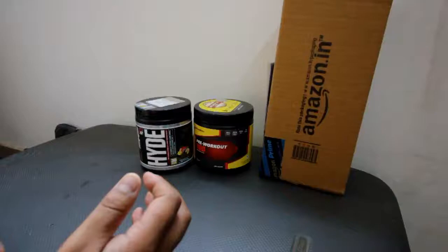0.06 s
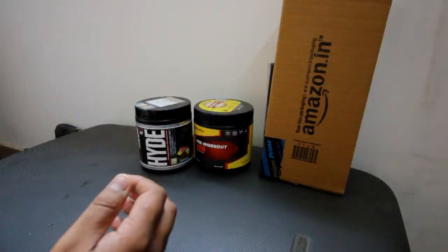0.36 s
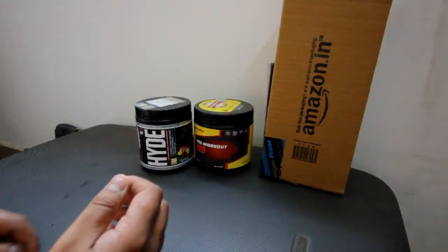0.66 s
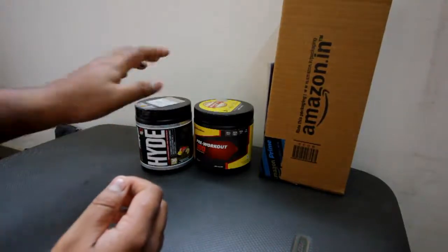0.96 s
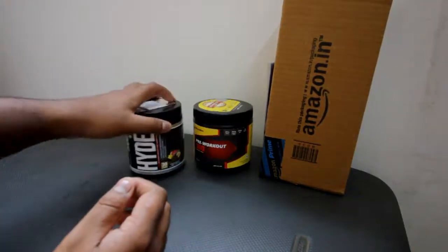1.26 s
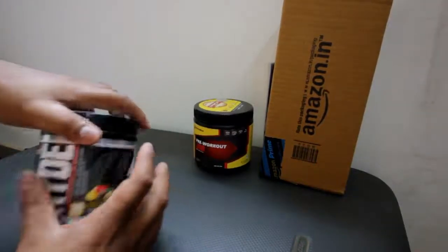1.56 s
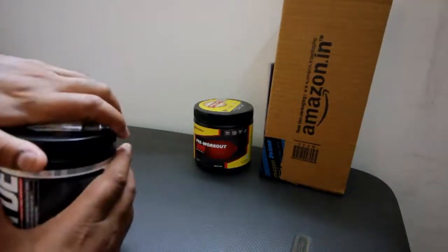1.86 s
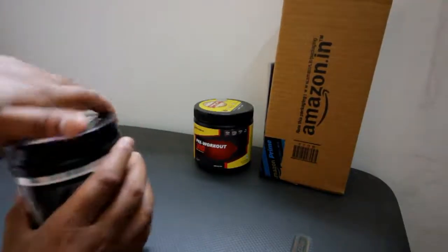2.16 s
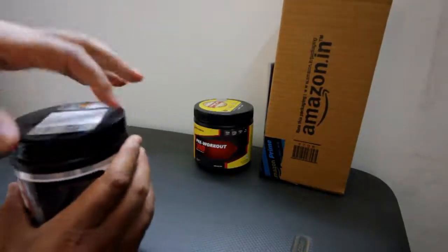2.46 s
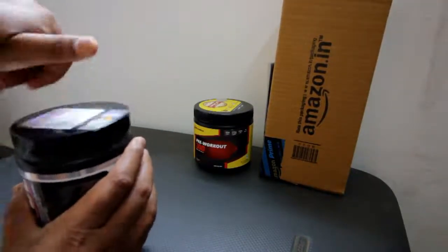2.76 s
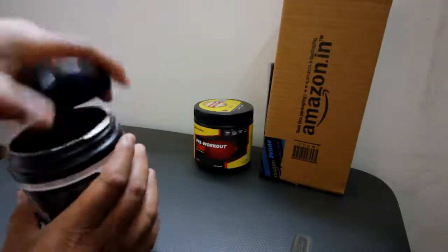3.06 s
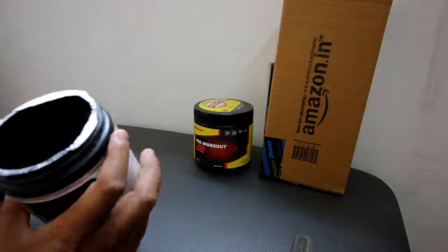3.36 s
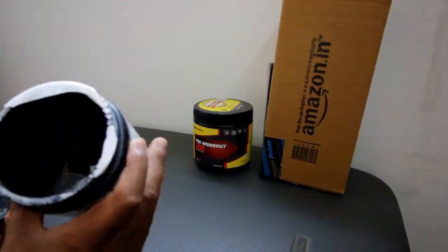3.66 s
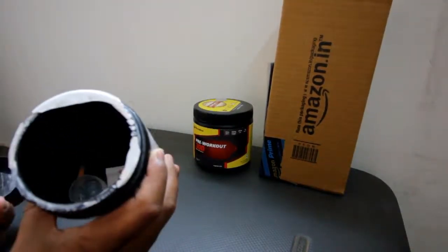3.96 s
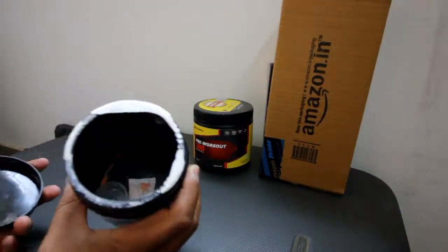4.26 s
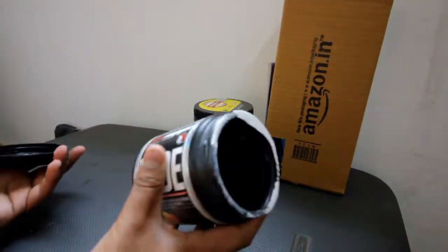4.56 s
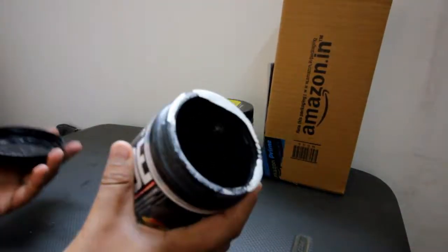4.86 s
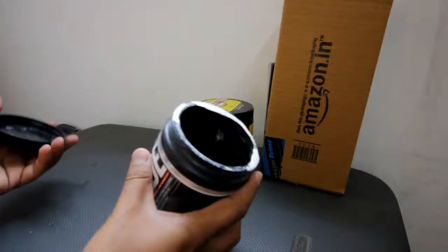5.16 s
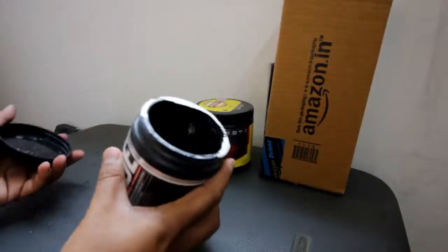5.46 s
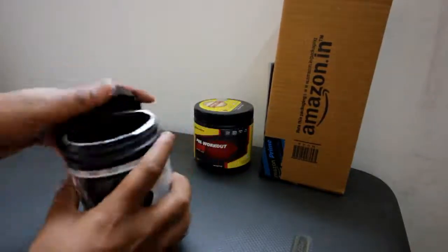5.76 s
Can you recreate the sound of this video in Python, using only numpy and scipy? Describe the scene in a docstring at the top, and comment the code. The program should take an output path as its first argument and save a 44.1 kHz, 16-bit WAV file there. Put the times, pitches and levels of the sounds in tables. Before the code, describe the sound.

Dull room noise and a faint hum run throughout in a small bare room with a short echo. A dry, distant click comes at the start, followed by soft brushing of skin. At about 1.1 seconds a plastic tub is grabbed close to the microphone, clattering and making the table boom. Hollow knocks follow near 1.6 seconds. From 2 to 3 seconds the lid unscrews in short scraping turns with clicks and soft thuds. Just after 3 seconds it snaps free with sharp clicks and a brief ring, and the open tub knocks and rubs until 3.6 seconds. Something light ticks inside around 4.5 seconds and more sharply at 5.3. At 5.7 seconds the lid lands back on the rim with the loudest hollow knocks. A few faint, thin, birdlike chirps sound far off during the first four seconds.

```python
"""A plastic tub is picked up from a table, unscrewed, tilted and closed again, close by in a small bare room.
Each knock makes the thin plastic click and the air inside ring with a hollow note. Fingers and
screw threads rub, the table top booms, and something light ticks inside the tilted tub.
Behind it are dull room noise, a faint hum, a few far clicks and some thin, high chirps."""
import sys
import numpy as np
from scipy import signal
from scipy.fft import rfft, irfft, next_fast_len
from scipy.io import wavfile
from scipy.ndimage import map_coordinates

SR = 44100
rng = np.random.default_rng(int(sys.argv[2]) if len(sys.argv) > 2 else 0)


def unload_audio(sound):
    """Save the sound as a 16-bit wav file, at the path given as the first command line argument."""
    columns = np.transpose(np.atleast_2d(sound))
    # keep every value between -1 and 1, then stretch to whole-number steps
    steps = np.round(np.clip(columns, -1, 1) * 32767)
    wavfile.write(sys.argv[1], SR, steps.astype(np.int16))


N = 256662

# how far the tub is open: (time [s], share open [0-1])
OPENING = [(3.08, 0.28), (3.14, 1), (5.6, 0.98), (5.7, 0.48)]
# tone colours of a fine hiss and of a dry snap: (frequency [Hz], level [dB])
HISS = [(3000, -1.5), (6000, -4), (8000, -1), (11000, 0.5), (13500, 0), (16000, -4)]
SNAP = [(400, -32), (1000, -6.5), (2500, -6.5), (4500, -0.5), (5800, -1), (8000, -9), (16000, -13)]


def amp(db):
    """Turn decibels into a gain."""
    return 10 ** (np.asarray(db) / 20)


def fade(t, t60):
    """A gain that dies away; t60 is the time in seconds it takes to drop by 60 dB."""
    return amp(-60 * t / t60)


def unit(x):
    """Scale x to an average strength (rms) of 1."""
    return x / np.sqrt(np.mean(x ** 2) + 1e-20)


def along(points, hz):
    """Read between (frequency, value) points on a log axis."""
    freqs, values = np.transpose(points)
    return np.interp(np.log(hz + 1), np.log(freqs), values)


def curves(rows):
    """One value per sample for each column after the time."""
    times, *columns = np.transpose(rows)
    return [np.interp(np.arange(N) / SR, times, column) for column in columns]


def wobble(rate):
    """A smooth random curve through rate points a second."""
    return map_coordinates(rng.standard_normal(int(N * rate / SR) + 4), [np.arange(N) * rate / SR])


def fuzzy(hz, width_hz):
    """Narrow noise around a steady or gliding pitch."""
    phase = 2 * np.pi * np.cumsum(hz * np.ones(N)) / SR
    return wobble(width_hz) * np.sin(phase) + wobble(width_hz) * np.cos(phase)


def filtered(x, response):
    """Give each frequency in x the gain response(hz)."""
    size = next_fast_len(len(x) + 4096)
    return irfft(rfft(x, size) * response(np.fft.rfftfreq(size, 1 / SR)), size)[:len(x)]


def coloured(x, spectrum):
    """Give x a tone colour, at rms 1."""
    return unit(filtered(x, lambda hz: amp(along(spectrum, hz))))


def resonant(x, peaks):
    """Pass x through a few resonances of alternating sign, at rms 1."""
    def response(hz):
        return sum((-1) ** k * amp(db) * 1j * hz * width / (centre ** 2 - hz ** 2 + 1j * hz * width)
                   for k, (centre, width, db) in enumerate(peaks))
    return unit(filtered(x, response))


def add(track, s, sound):
    """Mix a sound into the track at s seconds."""
    part = track[max(round(s * SR), 0):][:len(sound)]
    part += sound[:len(part)]


def swell(s, rise, hold, fall):
    """Gain of a hand movement: it speeds up until s, holds and dies; rise and fall each span 20 dB."""
    t = np.arange(N) / SR - s
    return amp(-20 * (np.maximum(-t, 0) / rise + np.maximum(t - hold, 0) / fall))


def ring(modes, t, scatter_db):
    """A struck object's own notes (modes) fade, each at a new strength for every blow."""
    return sum(amp(db + scatter_db * rng.standard_normal()) * fade(t, t60) * np.sin(2 * np.pi * hz * t)
               for hz, db, t60 in modes)


def struck(modes):
    """Ringing plastic, at rms 1 over its first 4 ms."""
    x = ring(modes, np.arange(SR // 6) / SR, scatter_db=3)
    return x / np.sqrt(np.mean(x[:SR // 250] ** 2))


def burst(spectrum, t60, hold_s=0.00096):
    """A crack that holds while the bending wave runs around the shell, then dies."""
    t = np.arange(SR // 6) / SR
    x = coloured(rng.standard_normal(len(t)), spectrum) * fade(np.maximum(t - hold_s, 0), t60)
    return x / np.sqrt(np.sum(x ** 2) / (SR // 250))  # the energy of 4 ms at rms 1


def background(noise_db=-42, drift_db=0.7548, hiss_db=-65):
    """Dull room noise, a faint, slightly unsteady hum and the microphone's own hiss."""
    # tone colour of the room noise, and the notes of the hum: (frequency [Hz], level [dB])
    noise_colour = [(12, -32), (20, 1), (63, -7.5), (86, -16), (222, -16.5), (335, -14), (1100, -22.5),
                    (3160, -33.5), (6180, -41.5), (16000, -71.5)]
    hum_notes = [(110, -59.5), (334, -57.5)]
    t = np.arange(N) / SR
    hum = sum(amp(db) * np.sqrt(2) * np.sin(2 * np.pi * hz * t + .5 * wobble(5.5))
              for hz, db in hum_notes)
    hiss = amp(hiss_db) * coloured(rng.standard_normal(N), HISS)
    noise = amp(noise_db + drift_db * wobble(4.1964)) * coloured(rng.standard_normal(N), noise_colour)
    return hum + hiss + noise


def room_tail(build_s=0.002):
    """Bare walls echo within a few milliseconds; the treble dies before the middle notes."""
    # how long the room rings: (frequency [Hz], t60 [s])
    ring_times = [(150, 0.3), (600, 0.6533), (2500, 0.45387), (6000, 0.3482), (14000, 0.30335)]
    hz, t, bands = signal.stft(rng.standard_normal(SR * 3 // 4), SR, nperseg=256)
    tail = signal.istft(bands * fade(t, along(ring_times, hz)[:, None]), SR, nperseg=256)[1]
    tail *= 1 - np.exp(-(np.arange(len(tail)) / SR / build_s) ** 2)
    return tail / np.linalg.norm(tail)


def room(x):
    """The bare room's short echo, drawn afresh every half second so it stays smooth."""
    out, step = np.zeros(N), SR // 2
    for i in range(0, N, step):
        add(out, i / SR, signal.fftconvolve(x[i:i + step], room_tail()))
    return out


def twitter(scatter_hz=650, bend_hz=300, scatter_db=3):
    """Quick runs of tiny, very high, bending notes; each run climbs and comes down again."""
    # (start [s], end [s], base pitch [Hz], climb [Hz], level [dB])
    runs = [(1.715, 1.9, 9500, 1900, -59), (3.67, 3.95, 9600, 2200, -61), (3.94, 4.22, 8700, 400, -67)]
    out, u = np.zeros(N), np.linspace(0, 1, SR // 30)  # u: progress through one note
    for start, end, base_hz, climb_hz, db in runs:
        for place in np.linspace(0, 1, num=12):
            pitch, glide, bend, size = rng.standard_normal(4)
            centre_hz = base_hz + climb_hz * np.sin(np.pi * place) + scatter_hz * pitch
            hz = centre_hz + bend_hz * (glide * np.cos(np.pi * u) + bend * np.sin(np.pi * u))
            note = np.sin(np.pi * u) ** 2 * np.sin(2 * np.pi * np.cumsum(hz) / SR)
            add(out, start + place * (end - start), amp(db + scatter_db * size) * note)
    return out


def chirps(octave_db=-9.5, flutter_db=4):
    """Hoarse whistles, perhaps a bird outdoors, that swell while their pitch falls ever faster."""
    # (time [s], length [s], start pitch [Hz], end pitch [Hz], level [dB])
    calls = [(0.43, 0.065, 4700, 4330, -51.5), (1.705, 0.11, 4700, 4130, -46),
             (2.425, 0.076, 4700, 4300, -44), (3.8, 0.125, 4540, 4130, -46), (3.94, 0.1, 4400, 4200, -53),
             (4.04, .19, 3500, 3430, -60)]
    out = np.zeros(N)
    waver_hz, flutter = 120 * wobble(750), flutter_db * wobble(182)
    for s, length, start_hz, end_hz, db in calls:
        u = np.linspace(0, 1, int(length * SR))
        now = round(s * SR) + np.arange(len(u))
        phase = 2 * np.pi * np.cumsum(start_hz + (end_hz - start_hz) * u ** 2 + waver_hz[now]) / SR
        whistle = np.sin(phase) + amp(octave_db) * np.sin(2 * phase)
        add(out, s, amp(db + flutter[now]) * np.sin(np.pi * u ** 1.4) * whistle)
    return out


def far_clicks(tail_db=-24.5):
    """Dry snaps from across the room, each with a long noisy echo."""
    # (time [s], level [dB], treble cut-off [Hz])
    clicks = [(0.1102, -22, 16000), (.113, -22, 16000), (.2858, -30, 6000)]
    out = np.zeros(N)
    for s, db, top_hz in clicks:
        sound = amp(tail_db) * coloured(room_tail(), SNAP)
        add(sound, 0, burst(SNAP, t60=0.018))
        add(out, s, amp(db) * filtered(sound, lambda hz: 1 / np.hypot(1, (hz / top_hz) ** 2)))
    return out


def table_top(press_gain_db=-1, press_rise_s=.015):
    """The grabbed tub rocks on the table top, which booms; pressing hands add soft thuds."""
    # bumps on the table: (time [s], level [dB])
    bumps = [(1.079, -22), (1.092, -18), (1.107, -19), (1.137, -23), (1.152, -22), (1.61, -39),
             (3.532, -32), (4.325, -31)]
    # the table's own notes: (pitch [Hz], level [dB], t60 [s])
    modes = [(71, .5, 0.34), (112.5, 3.5, 0.28), (144, -3, 0.16), (252.74, -8, 0.1248)]
    # hands pressing on table and tub: (time [s], hold [s], fall [s], level [dB], bass cut-off [Hz])
    presses = [(.18, .02, .3, -42, 80), (.65, .07, 0.0648, -36.5, 130), (1.088, .085, .19, -21, 45),
               (1.31, .01, .35, -38, 60), (2.17, .06, 0.1388, -36, 210), (2.246, .005, .04, -29, 180),
               (2.505, .005, 0.0459, -30.5, 200), (2.662, .04, 0.1305, -37.5, 200),
               (2.907, .005, 0.0538, -26, 180), (2.996, .01, 0.0026, -33, 220),
               (3.44, .05, 0.12, -36.5, 45), (3.54, .07, .1, -43.5, 30), (4.34, .02, 0.2437, -40, 50)]
    # tone colour of a thud: (frequency [Hz], level [dB])
    thud_colour = [(20, -23), (70, -1.5), (130, -3), (220, -1), (350, -10), (700, -24.5), (2000, -37),
                   (5000, -80)]
    out, t = np.zeros(N), np.arange(SR // 2) / SR
    for s, db in bumps:
        add(out, s, amp(db) * ring(modes, t, scatter_db=1))
    noise = coloured(rng.standard_normal(N), thud_colour)
    for s, hold, fall, db, low_hz in presses:
        thud = filtered(noise, lambda hz: hz ** 3 / np.hypot(hz ** 3, low_hz ** 3))
        out += amp(db + press_gain_db) * swell(s, press_rise_s, hold, fall) * thud
    return out


def brushing(grain_db=2):
    """Dry skin brushes over plastic and table with a fine, high whisper."""
    # (time [s], rise [s], hold [s], fall [s], level [dB])
    brushes = [(.6, .155, .1, .55, -53), (1.93, .044, .04, .1, -47), (4.325, .035, .05, .16, -49.5),
               (4.62, .01, .015, .07, -45), (4.805, .06, .04, .12, -50)]
    # tone colour of sliding skin: (frequency [Hz], level [dB])
    skin_colour = [(700, -8), (7500, -2), (11400, 4), (16000, -6)]
    level = sum(amp(db) * swell(s, rise, hold, fall) for s, rise, hold, fall, db in brushes)
    return level * coloured(amp(grain_db * wobble(160)) * rng.standard_normal(N), skin_colour)


def scoop(ring_db=-2.5, ping_db=-4, ping_t60=.03):
    """Something light, probably a scoop, shifts and ticks in the tilted tub."""
    # (time [s], ring level [dB], snap level [dB], pitch of the spot that is hit [Hz])
    ticks = [(4.508, -41, -50, 3610), (4.534, -40, -48, 4320), (4.581, -38, -47, 2070),
             (4.615, -36.5, -40, 2060), (5.249, -34, -39, 4360), (5.284, -24.5, -27, 5000)]
    # its own notes: (pitch [Hz], level [dB], t60 [s])
    modes = [(1820, -0.5, 0.045), (2098.3, -1, 0.06), (3083, 3, 0.017), (4400, 4.5, 0.03),
             (4850, 3, 0.02226)]
    out = np.zeros(N)
    for s, db, snap_db, hz in ticks:
        plastic = amp(ring_db) * struck(modes) + amp(ping_db) * struck([(hz, 0, ping_t60)])
        add(out, s, amp(db) * plastic + amp(snap_db) * burst(SNAP, t60=0.01983))
    return out


def free_rings(width_hz=170):
    """Plastic rings on when little damps it: the tub off the table, then the lid off the tub."""
    # (time [s], pitch [Hz], level [dB], t60 [s])
    rings = [(1.327, 2790, -39, .12), (3.1195, 2040, -28.5, .27)]
    out, t = np.zeros(N), np.arange(SR // 2) / SR
    for s, hz, db, t60 in rings:
        add(out, s, amp(db) * fade(t, t60) * fuzzy(hz, width_hz)[:len(t)])
    return out


def lid_lift(width_hz=110):
    """The scraping lid stirs the air in the tub; the hollow note rises as the gap opens."""
    # (time [s], pitch [Hz], level [dB])
    glide = [(2.98, 260, -48), (3.018, 410, -29), (3.05, 560, -32), (3.09, 620, -40), (3.14, 650, -70)]
    hz, db = curves(glide)
    t = np.arange(N) / SR
    return amp(db) * fuzzy(hz, width_hz) * (t > glide[0][0]) * (t < glide[-1][0])


def rubbing(catches_per_s=3200, catch_share=0.3, grip_db=1.6, jolt_db=2.2,
            scrape_db=-1, hiss_db=3.5, hollow_db=-1, lid_db=-8):
    """Plastic slides with tiny catches; the friction also stirs the tub's air and rings the freed lid."""
    # fingers, tub and screw threads sliding:
    # (time [s], rise [s], hold [s], fall [s], scrape [dB], hiss [dB], hollow ring [dB])
    strokes = [(.31, .04, .05, .14, -50, -64, -66), (1.11, 0.0213, 0.08047, .25, -45, -58, -33.5),
               (1.24, .12, 0.06454, .1, -47, -53, -42), (1.352, .06, .007, .022, -33, -41, -45),
               (1.57, 0.02086, 0.03943, 0.0665, -46, -50, -64.5),
               (2.015, 0.10466, .03, .1, -41, -45, -64.5), (2.16, .07, 0.08729, 0.05014, -38, -38, -35),
               (2.2, .015, .006, 0.032, -24, -25, -37), (2.58, 0.06778, 0.056, 0.0987, -41.5, -41, -52.5),
               (2.668, 0.12, 0.048, .09, -37, -34, -38), (2.785, .04, .005, .03, -49, -53, -44),
               (3.011, .05, .06, 0.1, -30, -37, -41), (3.125, .02, .025, .09, -36, -50, -33),
               (3.15, 0.05025, 0.2471, 0.0996, -46.5, -59, -39.5), (3.47, .14, .04, .08, -43, -45, -33.5),
               (4.54, .1, .1, 0.11, -51, -56, -50), (5.157, .009, .012, .03, -44, -45, -67),
               (5.362, .09, .01, 0.08856, -55, -46.5, -40), (5.74, 0.05891, 0.0771, .1, -48, -50, -29)]
    # tone colour of the scrape: (frequency [Hz], level [dB])
    scrape_colour = [(300, -7), (1500, -2.5), (3500, 4.5), (5200, 1), (7500, -7.5), (16000, -57.5)]
    # resonances of the air in the closed and open tub, and of the lid: (pitch [Hz], width [Hz], level [dB])
    closed_air = [(335.66, 93, -9.5), (446.85, 86.24, -3), (494.44, 71.83, -5.5), (1029.2, 230, -15.5)]
    open_air = [(498.46, 32, 2), (659.63, 48, 2), (1011.8, 160, -13)]
    lid_peaks = [(1060, 160, -5), (1510, 120, -4), (2040, 90, 0), (3150, 450, -6), (3940, 400, -6)]
    power = sum(np.outer(amp(levels), swell(s, rise, hold, fall)) ** 2
                for s, rise, hold, fall, *levels in strokes)
    scrape_gain, hiss_gain, hollow_gain = np.sqrt(power + 1e-12)
    catches = unit((rng.random(N) < catches_per_s / SR) * rng.standard_normal(N))
    grip = amp(grip_db * wobble(160))

    def friction():
        return grip * (np.sqrt(catch_share) * catches + np.sqrt(1 - catch_share) * rng.standard_normal(N))

    opening = curves(OPENING)[0]
    open_ring = resonant(friction(), open_air) + amp(lid_db) * resonant(friction(), lid_peaks)
    hollow = np.sqrt(1 - opening) * resonant(friction(), closed_air) + np.sqrt(opening) * open_ring
    # the scrape comes in jolts as the threads stick and slip
    scrape = amp(scrape_db) * coloured(friction() * amp(jolt_db * wobble(90)), scrape_colour)
    hiss = amp(hiss_db) * coloured(friction(), HISS)
    return scrape_gain * scrape + hiss_gain * hiss + hollow_gain * amp(hollow_db) * hollow


def tub_knocks(click_db=-0.7, wall_db=-8, dull_db=-13.5, ping_db=-7.5, air_db=7.5, lower_db=-5,
               ping_t60=0.024, closed_t60=0.064815, open_t60=0.065, smear_t60=0.055,
               air_rise_s=0.0021316, lower_ratio=.79, grip_detune=0.017):
    """Lid, tub and fingers meet: a crack, ringing plastic and a hollow note -> (direct, scattered)."""
    # the tub is grabbed; the lid turns, snaps free and at last lands back on the rim:
    # (time [s], click [dB], sharp edge [dB], hollow knock [dB], air pitch [Hz], ping pitch [Hz])
    contacts = [ (1.082, -29, -34, -39.5, 586, 2185), (1.097, -23, -36, -40.5, 420, 3660),
                (1.1105, -16, -28, -48.5, 375, 2185), (1.14, -27, -59.5, -33, 466, 2260),
                (1.1655, -28, -61, -30, 400, 2594), (1.358, -31, -43, -45, 458, 3391),
                (1.632, -28, -55, -17, 513, 2228), (1.65, -24, -37, -31, 468, 2500),
                (1.6675, -26.5, -54, -20.5, 523, 2842), (2.133, -29, -52.5, -23.5, 532, 1259),
                (2.145, -35, -52, -25, 530, 1798), (2.164, -42, -39, -26, 437, 7450),
                (2.246, -31, -34, -28, 390, 1528), (2.275, -35.5, -55, -32.5, 520, 1033),
                (2.333, -48, -64, -32.5, 474, 1141), (2.5005, -34, -46, -28, 378, 5178),
                (2.516, -37, -32.5, -33, 468, 5146), (2.6004, -24.5, -50, -27, 528, 968),
                (2.904, -31, -35, -27, 442, 3036), (3.0112, -20, -15, -34, 423, 6395),
                (3.0409, -17.5, -11.3, -38, 521, 9800), (3.056, -26.5, -41.5, -29, 543, 947),
                (3.0927, -21, -15.5, -59, 650, 9646), (3.1015, -17, -22, -31, 651, 3951),
                (3.1195, -13.5, -35, -19, 640, 2040), (3.229, -56.5, -61, -31, 640, 1060),
                (3.251, -40, -52, -26, 610, 1060), (3.285, -41, -45, -23, 665, 1510),
                (3.334, -37, -59.5, -29, 600, 1981), (3.391, -31.5, -37, -40, 640, 5017),
                (3.4084, -37, -39, -32, 640, 2060), (3.454, -36, -43, -25.5, 630, 1012),
                (3.4605, -50, -29, -33, 683, 8430), (3.484, -21.5, -26, -21, 662, 3100),
                (3.531, -30, -35, -42, 640, 3908), (3.6003, -30, -32, -33, 650, 4931),
                (3.622, -41, -50, -38, 650, 4200), (5.36, -42, -32, -36, 600, 12736),
                (5.3775, -32, -55, -25, 620, 958), (5.385, -48, -56, -30, 648, 1647),
                (5.712, -19, -27, -14, 505, 1873), (5.734, -15, -29, -8.5, 493, 2734),
                (5.781, -29, -56, -13, 525, 1808), (5.812, -27, -49.5, -24, 472, 1722)]
    # own notes of the thin tub wall and of the freed lid: (pitch [Hz], level [dB], t60 [s])
    wall_modes = [(955.05, 0, 0.058), (1528.2, -7, 0.053), (1807.3, -4, 0.07), (2333.8, 6.5, 0.039),
                  (2736.5, 7.5, 0.027), (4438.5, -2, 0.03)]
    lid_modes = [(1053.2, 2.5, 0.04752), (2054.2, -6.5, 0.1), (2505, -5.5, 0.06965), (3022, 0, 0.074),
                 (4050, 8.5, 0.026), (4790.7, 11, 0.016)]
    # tone colours of the click and of its sharp edge: (frequency [Hz], level [dB])
    click_colour = [(300, -14.5), (900, 1.5), (2000, 6), (4500, 4), (5800, -8.5), (16000, -82.5)]
    edge_colour = [(2500, -59), (5500, 2.5), (7000, -3), (10500, -1.5), (13000, -4.5), (16000, -4.5)]
    direct, scattered = np.zeros(N), np.zeros(N)
    t = np.arange(SR // 6) / SR
    for s, click, edge, knock, air_hz, ping_hz in contacts:
        is_open = np.interp(s, *np.transpose(OPENING)) > .5
        force_db = max(click, edge)
        # the changing grip shifts the notes a little from blow to blow
        modes = [(hz * (1 + grip_detune * rng.standard_normal()), db, t60)
                 for hz, db, t60 in (lid_modes if is_open else wall_modes)]
        # sharp clicks ring all the notes, dull knocks only the lowest
        plastic = amp(click + wall_db) * struck(modes) + amp(knock + dull_db) * struck(modes[:3])
        # the spot that is hit adds a short ping
        ping = amp(force_db + ping_db) * struck([(ping_hz, 0, ping_t60)])
        # the gap under the lid sets the air's pitch; the open tub adds a lower note
        phase = 2 * np.pi * air_hz * t
        notes = np.sin(phase) + is_open * amp(lower_db) * np.sin(lower_ratio * phase)
        air = notes * fade(t, open_t60 if is_open else closed_t60) * (1 - np.exp(-t / air_rise_s))
        body = plastic + ping + amp(knock + air_db) * air
        click_gain, edge_gain = amp(click + click_db), amp(edge)
        crack = click_gain * burst(click_colour, t60=0.023) + edge_gain * burst(edge_colour, t60=0.014)
        # a light touch builds up more slowly than a hard snap
        rise_s = np.interp(force_db, [-42, -30], [.0008, 1 / SR])
        add(direct, s, body + crack * (1 - np.exp(-t / rise_s)))
        # hands and table smear the crack on its way into the room
        smear = click_gain * burst(click_colour, smear_t60) + edge_gain * burst(edge_colour, smear_t60)
        add(scattered, s, body / 2 + smear)
    return direct, scattered


def scene(chirp_direct_db=-4, chirp_room_db=-1.5, handling_room_db=-1):
    """The tub close by and the chirps far off, all in one room."""
    # the nearer the tub, the less echo: (time [s], level sent into the room [dB])
    echo_levels = [(.3, 3.5), (1.1, -7.5), (3.0, -11.5), (5.8, -7.5)]
    knocks, scattered = tub_knocks()
    handling = rubbing() + brushing() + lid_lift() + free_rings() + scoop()
    far_chirps = chirps() + twitter()
    tub_to_room = (scattered + amp(handling_room_db) * handling) * amp(curves(echo_levels)[0])
    echo = room(tub_to_room + amp(chirp_room_db) * far_chirps)
    direct = knocks + handling + far_clicks() + table_top() + amp(chirp_direct_db) * far_chirps
    return (direct + echo + background())[None]


def record(dry, start_s=.095, ceiling=.95, low_hz=35, top_hz=16000):
    """The microphone opens after a moment, rounds off peaks and drops the deepest bass and top treble."""
    live = dry[0] * (np.arange(N) / SR > start_s)
    rounded = live / (1 + (live / ceiling) ** 6) ** (1 / 6)
    return filtered(rounded, lambda hz: hz ** 2 / np.hypot(hz ** 2, low_hz ** 2) * (hz < top_hz))[None]


dry = scene()
out = record(dry)
unload_audio(out)
```